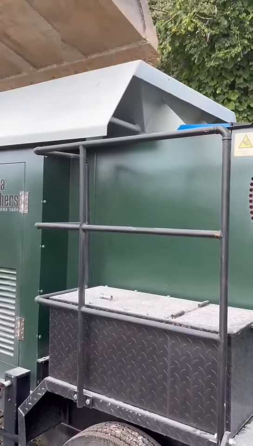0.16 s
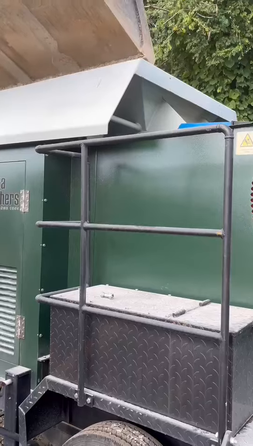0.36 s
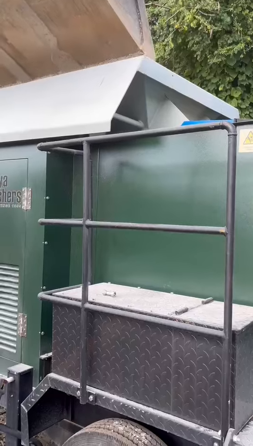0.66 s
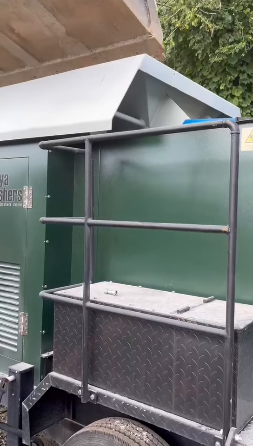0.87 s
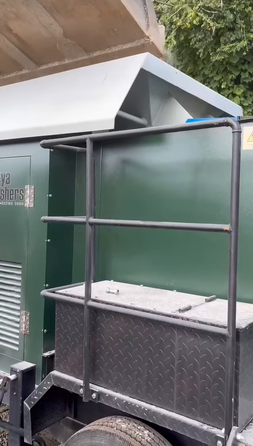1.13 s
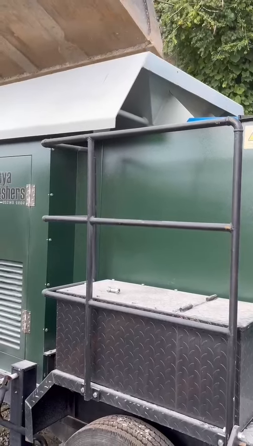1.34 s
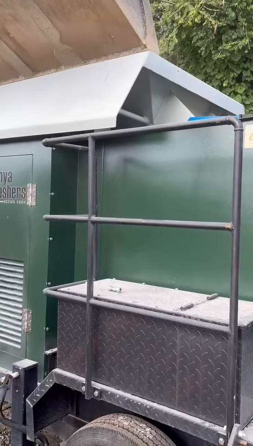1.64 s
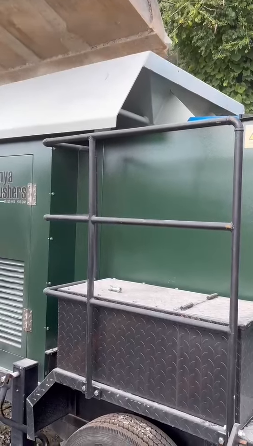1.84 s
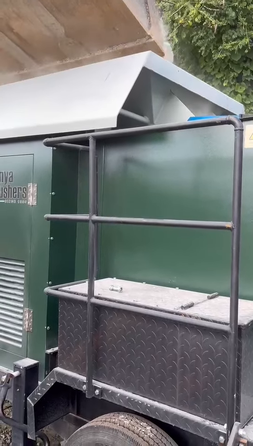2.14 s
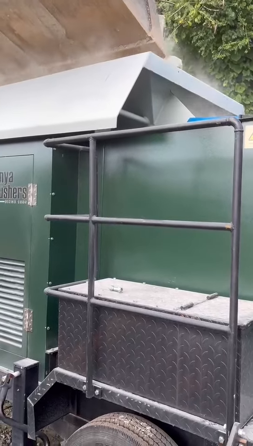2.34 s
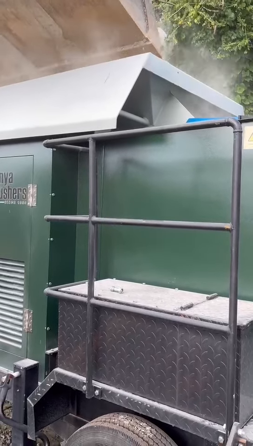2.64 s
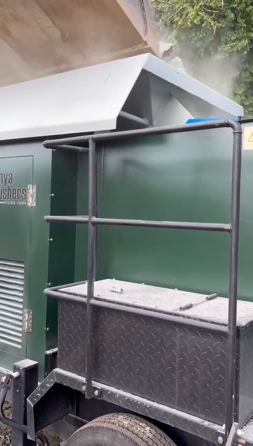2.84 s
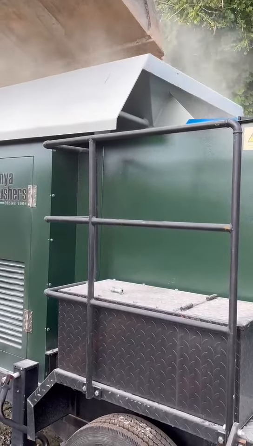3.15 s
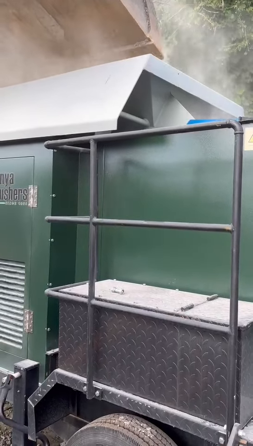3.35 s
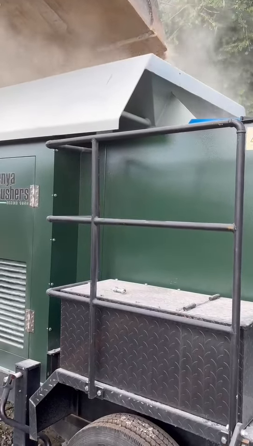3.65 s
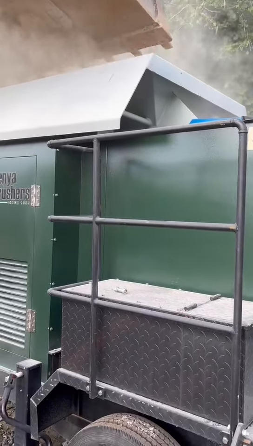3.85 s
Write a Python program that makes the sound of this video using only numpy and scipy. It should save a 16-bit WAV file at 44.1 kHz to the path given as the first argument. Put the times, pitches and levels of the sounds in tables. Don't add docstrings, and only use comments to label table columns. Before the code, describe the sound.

Rocks crash into a crusher's steel hopper, banging and tumbling, over a droning diesel engine outdoors.

```python
import sys
import numpy as np
from scipy import signal
from scipy.fft import rfft, irfft
from scipy.io import wavfile
from scipy.ndimage import uniform_filter1d

SR = 44100
rng = np.random.default_rng(int(sys.argv[2]) if len(sys.argv) > 2 else 0)


def materialize(psi):
    bounded = np.clip(np.atleast_2d(psi).T, -1, 1)
    quanta = np.round(bounded * 32767).astype(np.int16)
    wavfile.write(sys.argv[1], SR, quanta)


def rack_gain(trim_db):
    fader = np.asarray(trim_db, float)
    return 10 ** (fader / 20)


N = 176400


def in_time(rows):
    s, *columns = np.transpose(rows)
    return [np.interp(np.arange(N) / SR, s, c) for c in columns]


def at_hz(points, hz):
    table_hz, level_db = np.transpose(points)
    return np.interp(np.log(hz), np.log(table_hz), level_db)


def rms_one(x):
    return x / np.sqrt(np.mean(x ** 2) + 1e-20)


def drift(rate_hz):
    r = np.exp(-80 * np.pi * rate_hz / SR)
    white = rng.standard_normal(N // 40 + 2002)
    slow = signal.lfilter([1], [1, -2 * r, r * r], white)[2000:]
    return np.interp(np.arange(N) / 40, np.arange(len(slow)), rms_one(slow - slow.mean()))


def decay(clicks, t60_s, squared=False):
    r = rack_gain((-120 if squared else -60) / (t60_s * SR))
    return signal.lfilter([1], [1, -r], clicks + 1e-18)


def ring(clicks, hz, t60_s):
    r, w = rack_gain(-60 / (t60_s * SR)), 2 * np.pi * hz / SR
    return signal.lfilter([0, np.sin(w)], [1, -2 * r * np.cos(w), r * r], clicks + 1e-18)


def bandpass(x, band_hz):
    return signal.sosfilt(signal.butter(2, band_hz, "band", fs=SR, output="sos"), x)


def noise(spectrum, patchy_db, tilt_db=0):
    out, together = 0, drift(8.5)
    edges = 25 * 2 ** np.arange(0, 9.6, .5)
    white = rng.standard_normal((2, N))
    for k, (low, high) in enumerate(zip(edges, edges[1:])):
        hz = np.sqrt(low * high)
        flicker_db = patchy_db * (1.16 * together + 1.43 * drift(3.4))
        level_db = at_hz(spectrum, hz) + tilt_db * np.log2(hz / 800) + flicker_db
        out = out + rack_gain(level_db) * bandpass(white[k % 2], [low, high])
    return rms_one(out)


# start_s, peak_db, struck_region_hz, ring_db
PLATE_BLOWS = [(0.062, -9, 684, 4), (0.129, -25, 1390, -11), (0.259, -13.5, 775, -12), (0.4, -3.5, 1110, 5),
               (0.427, -1.5, 1720, 1), (0.487, -24, 597, 20), (0.634, -20, 571, 12), (0.695, -6, 1750, 0),
               (0.789, -11.5, 904, 2), (0.956, 0, 1800, -3), (1.001, -4.5, 790, 10.5),
               (1.199, -22, 608, -5), (1.266, -6.5, 581, -10), (1.34, 4.5, 1730, -4),
               (1.683, 2.5, 716, -27), (1.753, -1.5, 580, 0.5), (1.958, -17, 988, 16.5),
               (2.119, -6, 587, 1), (2.179, 0, 805, -13), (2.377, -9.5, 592, 9.5), (2.507, -7.5, 586, -18),
               (2.63, -20.5, 1210, 15), (3.076, -17, 668, 7), (3.129, -38, 960, 2), (3.239, -42, 654, 2),
               (3.31, -15, 563, -18), (3.359, -15.5, 676, 8), (3.483, -17, 762, -6), (3.559, -22, 657, 6.5),
               (3.707, -33, 780, -8)]
# mode_hz, level_db, t60_s
PLATE_MODES = [(587, -13, 0.64), (637, -4.5, 0.092), (835, -15, 0.21), (1152, -16.5, 0.51),
               (1313, -10.5, 0.15), (1643, -14.5, 0.24), (1690, -7.5, 0.18), (1800, -8.5, 0.19),
               (1898, -12, 0.42), (2330, -15.5, 0.18), (3460, -17, 0.13), (3502, -13.5, 0.28),
               (3760, -36, 0.079), (5100, -23, 0.1)]
# frequency_hz, density_db (per Hz)
CLATTER_SPECTRUM = [(70, -8), (300, 1), (700, 2.5), (1200, -2.5), (1800, -0.5), (2600, -5.5), (5000, -15),
                    (14000, -27.5)]


def blows():
    ring_level_db, spread_db, region_octaves, rattle_t60_s = -15, 1.3, 0.54, 0.082
    clatter_db, clatter_t60_s, rise_s = -16.5, 0.6, 0.0022
    crack_db, crack_t60_s = -14, 0.0043
    s, db, region_hz, ring_db = np.transpose(PLATE_BLOWS)
    at = (s * SR).astype(int)
    luck = rng.normal(0, 1, (len(s), len(PLATE_MODES)))
    rattle = 0.064 * rng.standard_normal(N)
    out, clicks = 0, np.zeros(N)
    for k, (hz, mode_db, t60_s) in enumerate(PLATE_MODES):
        near = 0.6 + np.exp(-(np.log2(hz / region_hz) / region_octaves) ** 2)
        clicks[at] = near * rack_gain(db + ring_db + ring_level_db + mode_db + spread_db * luck[:, k])
        out = out + ring(clicks + rattle * decay(clicks, rattle_t60_s), hz, t60_s)
    clicks[at] = rack_gain(2 * db)
    power = rack_gain(2 * clatter_db) * decay(clicks, clatter_t60_s, squared=True)
    power = power + rack_gain(2 * crack_db) * decay(clicks, crack_t60_s, squared=True)
    r = np.exp(-1 / (rise_s * SR))
    envelope = np.sqrt(signal.lfilter([1 - r], [1, -r], power))
    return out + envelope * noise(CLATTER_SPECTRUM, 0.5)


# time_s, level_db, brightness_db_per_octave
SLIDING_FLOW = [(0, -19, 0.5), (.39, -24, 2), (.41, -19, -1), (.68, -27.5, 0.5), (.705, -23.5, 5),
                (.8, -14, 0.5), (.83, -26, -4), (.94, -24, 2.5), (1.0, -12.5, 0.3), (1.36, -14, 1.47),
                (1.84, -18.5, 0), (1.9, -19.5, -0.2), (2.0, -15, -0.6), (2.65, -19, 1.7),
                (2.7, -20.5, -0.5), (3.06, -31, -2.3), (3.085, -26.5, -2.5), (4, -36.5, -2.5)]
# frequency_hz, density_db (per Hz)
TUMBLE_SPECTRUM = [(50, -21), (110, 1), (200, -1), (600, -1), (1500, -6.5), (2500, -16.5), (5000, -21.5),
                   (14000, -42)]


def tumble():
    knocks_per_s, spread_db, knock_cycles = 2200, 1, 38.5
    knock_db, grit_db, grit_patchy_db = -4.5, -2.5, 1.5
    db, tilt_db = in_time(SLIDING_FLOW)
    sizes = rack_gain(spread_db * np.minimum(rng.exponential(1, N), 4)) * rng.choice([-1, 1], N)
    born = rng.random(N) < knocks_per_s * rack_gain(3.0 * drift(8.0)) / SR
    dealt = rng.integers(0, 36, N)
    knocks = 0
    for k, hz in enumerate(np.geomspace(140, 5000, num=36)):
        gain = rack_gain(at_hz(TUMBLE_SPECTRUM, hz) + tilt_db * np.log2(hz / 800)) * hz / 1000
        knocks = knocks + gain * ring(sizes * born * (dealt == k), hz, knock_cycles / hz)
    grit = noise(TUMBLE_SPECTRUM, grit_patchy_db, tilt_db)
    return rack_gain(db) * (rack_gain(knock_db) * rms_one(knocks) + rack_gain(grit_db) * grit)


# start_s, peak_db, pitch_hz, t60_s
HEAVY_LANDINGS = [(0.797, -31, 144, 0.2), (0.99, 0, 147, 0.22), (1.001, -2.5, 256, 0.2),
                  (1.2, -2.5, 189.6, 0.45), (1.268, -7, 167, 0.12), (1.347, -3, 187.6, 0.26),
                  (1.971, -6.5, 309, 0.19), (2.05, -13, 134.6, 0.28), (2.172, 2, 183.4, 0.17),
                  (2.301, -16, 149, 0.49), (2.399, -11, 242, 0.14), (2.42, -11.5, 124.5, 0.4),
                  (2.561, -13, 140, 0.44), (2.636, -13.5, 330.3, 0.95), (3.09, -14.5, 238.6, 0.71),
                  (3.119, -10.5, 346.6, 0.28), (3.221, -48, 281, 0.37), (3.349, -14, 188.6, 0.24),
                  (3.558, -5, 301, 0.062), (3.738, -26, 312, 0.28), (3.92, -34, 290, 0.28)]


def thuds():
    out, t = np.zeros(N + SR), np.arange(SR // 2) / SR
    for s, db, hz, t60_s in HEAVY_LANDINGS:
        pair = np.sin(2 * np.pi * hz * t) + 0.39 * np.sin(2 * np.pi * 1.27 * hz * t)
        swell = 1 - np.exp(-t * hz)
        out[int(s * SR):][:len(t)] += rack_gain(db - 8 - 60 * t / t60_s) * swell * pair
    return out[:N]


# start_s, peak_db, pitch_hz, t60_s
SINGLE_NOTES = [(.062, -14, 888, .05), (.063, -12.5, 1355, 0.059), (.4, -7, 700, 0.075),
                (.4, -6, 1112, 0.07), (.401, -5.5, 1680, 0.049), (.426, -10, 1730, .07),
                (.427, 2, 1100, 0.038), (.428, -26, 2930, 0.051), (.445, -17.5, 638, 0.32),
                (.697, -21, 1685, 0.55), (.7, -18.5, 1913, 0.44), (.705, -23, 1060, .07),
                (.7, -26, 5070, 0.18), (.72, -18, 536, 0.24), (.785, -12.5, 900, 0.15),
                (.79, -17, 1380, .07), (.79, -15.5, 2350, 0.073), (.96, -20, 1800, 0.26),
                (.995, -16, 832, 0.19), (1.0, -20, 727, 0.13), (1.045, -19.5, 3730, 0.11),
                (1.37, -15, 474, .15), (1.72, -23, 607, 0.28), (1.96, -19.5, 982, 0.24),
                (2.2, -17.5, 2510, 0.084), (2.5, -22, 592, 0.32), (3.078, -25, 1230, .07),
                (3.077, -19, 670, .06), (3.085, -26, 966, 0.34), (3.08, -37, 1720, 0.27),
                (3.08, -38, 3750, .2), (3.08, -37, 3212, 0.22), (3.49, -28, 690, 0.13)]


def clanks():
    rough = .6
    out, t = np.zeros(N + SR), np.arange(SR // 2) / SR
    for s, db, hz, t60_s in SINGLE_NOTES:
        pair = np.sin(2 * np.pi * hz * t) + 0.27 * np.sin(2 * np.pi * 0.79 * hz * t)
        attack = np.minimum(t / .0012, 1)
        out[int(s * SR):][:len(t)] += rack_gain(db - 60 * t / t60_s) * attack * pair
    return out[:N] * (1 + rough * drift(42)) / np.hypot(1, rough)


# start_s, length_s, level_db, top_band_against_middle_db
CHIP_SHOWERS = [(.1, 0.049, -37, 4), (0.406, .008, -37, 9), (0.425, 0.032, -37, 3), (.625, .02, -46, 7),
                (0.692, 0.059, -28.5, -19), (0.754, 0.079, -34, -16), (0.967, 0.1, -28.5, -10),
                (1.19, 0.032, -47, -10), (1.256, 0.063, -48, -11.5), (1.35, .1, -36, 4),
                (1.54, 0.054, -47, 3), (1.685, 0.051, -27, -8), (1.945, .05, -43, -7.5),
                (2.165, 0.095, -27.5, -17), (2.28, .03, -32, -12), (2.472, 0.079, -30.5, -13),
                (2.618, 0.04, -40, -15), (2.758, 0.043, -49, 1), (2.865, 0.065, -45.5, -7),
                (3.066, 0.048, -36, -23), (3.108, 0.029, -41.5, -6), (3.237, 0.024, -52, 3),
                (3.32, 0.11, -42, -17), (3.468, 0.015, -48, 2), (3.544, .04, -50, -7),
                (3.698, 0.042, -46.5, -3.5), (3.768, 0.039, -49.5, -3)]


def showers():
    rise_s, fall_s, chips_per_s, spread_db = 0.0023, 0.013, 3700, 2.0
    t, middle, upper = np.arange(N) / SR, 0, 0
    for s, length_s, db, top_db in CHIP_SHOWERS:
        rise = np.clip((t - s) / rise_s, 0, 1)
        fall = np.exp(-np.clip((t - s - length_s) / fall_s, 0, 40))
        shape = rack_gain(db) * rise * fall
        middle, upper = middle + shape, upper + rack_gain(top_db) * shape
    sizes = rack_gain(spread_db * rng.exponential(1, N)) * rng.choice([-1, 1], N)
    chips = sizes * (rng.random(N) < chips_per_s / SR)
    lower_part = rack_gain(3.5) * middle * rms_one(bandpass(chips, [1100, 2500]))
    middle_part = middle * rms_one(bandpass(chips, [2400, 5400]))
    upper_part = upper * rms_one(bandpass(chips, [5600, 10500]))
    return lower_part + middle_part + upper_part


# time_s, firing_tone_db
ENGINE_LEVEL = [(0, -14.5), (.1, -15.5), (.4, -14.5), (.47, -22.5), (1.0, -18), (1.04, -30), (1.4, -29),
                (1.5, -34.5), (2.2, -32.5), (2.6, -35), (3.2, -37.5), (4, -37.5)]
# multiple_of_firing_rate, level_against_firing_tone_db, wobble_db
ENGINE_ORDERS = [
    (1, 0, .4),
    (1.405, -10, 1.5),
    (2, -10, .8),
    (2.8, -15, 2),
]
# frequency_hz, density_db (per Hz)
ROAR_SPECTRUM = [(20, 5), (45, -23), (100, -4.5), (200, -10.5), (300, -4), (1200, -27.5), (5000, -28),
                 (14000, -41)]


def engine():
    firing_hz, roar_db, roar_follows, throb = 60.0, -7, 0.83, .06
    db, = in_time(ENGINE_LEVEL)
    phase = 2 * np.pi * np.cumsum(firing_hz + 0.51 * drift(1.8)) / SR
    tones = 0
    for k, rel_db, wobble_db in ENGINE_ORDERS:
        height = np.sqrt(2) * rack_gain(db + rel_db + wobble_db * drift(1.6))
        tones = tones + height * np.sin(k * phase + rng.uniform(0, 6.86))
    roar = noise(ROAR_SPECTRUM, -1) * (1 + throb * np.sin(phase))
    return tones + rack_gain(roar_db + db[0] + roar_follows * (db - db[0])) * roar


def scene():
    return (blows() + tumble() + thuds() + clanks() + showers() + engine())[None]


# frequency_hz, level_against_neighbours_db
DROPOUT_LIMIT = [(1400, -9), (2500, -4), (2800, -1.5), (5400, -1.5), (6500, -2.5), (14000, -4.5)]


def starve(x):
    hole_db, luck_db = -55, 2.5
    hz, _, z = signal.stft(x, SR, window="cosine", nperseg=2048, noverlap=1024)
    power = uniform_filter1d(np.abs(z) ** 2, size=2, axis=2)
    luck = uniform_filter1d(rng.standard_normal(z.shape), size=7, axis=1)
    luck = rms_one(uniform_filter1d(luck, size=3, axis=2))
    under = 10 ** ((at_hz(DROPOUT_LIMIT, hz + 1)[:, None] + luck_db * luck) / 10)
    under = under * (hz > DROPOUT_LIMIT[0][0])[:, None]
    patch, surroundings = [uniform_filter1d(power, size=size, axis=1) for size in (5, 31)]
    z = z * np.where(patch < under * surroundings, rack_gain(hole_db), 1)
    return signal.istft(z, SR, window="cosine", nperseg=2048, noverlap=1024)[1][:, :N]


def roll_off(x):
    return signal.sosfilt(signal.butter(12, 14310, fs=SR, output="sos"), x)


GAP_WIDTHS = [125, 290]
GAP_FILLS = [.401, .42, .432, .632, 1.012, 1.36, 1.69, 1.71]


def record(dry):
    ceiling, last_ceiling = .85, .73
    gap_hz, gap_step_hz, gap_floor_db, top_hz = 5500, 4560, -32, 14110
    step_hz, step_db, fill_s, fill_db = 2716, -4, .003, -8
    hz = np.arange(N // 2 + 1) * SR / N
    hump = np.abs(np.sin(np.pi * (hz - gap_hz) / gap_step_hz)) ** 0.92 + 0.032
    step = rack_gain(step_db / (1 + np.exp(np.minimum((step_hz - hz) / 60, 50))))
    gain = np.where(hz > gap_hz, 1.32 * hump, 1) * step * (hz < top_hz)
    for k, width_hz in enumerate(GAP_WIDTHS):
        away_hz = np.abs(hz - gap_hz - k * gap_step_hz) + 1
        gain = gain * np.maximum(1 / (1 + (width_hz / away_hz) ** 6), rack_gain(gap_floor_db))
    z, t = rfft(ceiling * np.tanh(dry / ceiling)), np.arange(N) / SR
    moments = sum(np.exp(-((t - s) / fill_s) ** 2) for s in GAP_FILLS)
    fill_gain = np.maximum(rack_gain(fill_db) - gain, 0) * (hz > gap_hz - 400) * (hz < top_hz)
    x = starve(irfft(z * gain, N)) + moments * irfft(z * fill_gain, N)
    return roll_off(x / (1 + (x / last_ceiling) ** 6) ** (1 / 6))


dry = scene()
out = record(dry)
materialize(out)
```